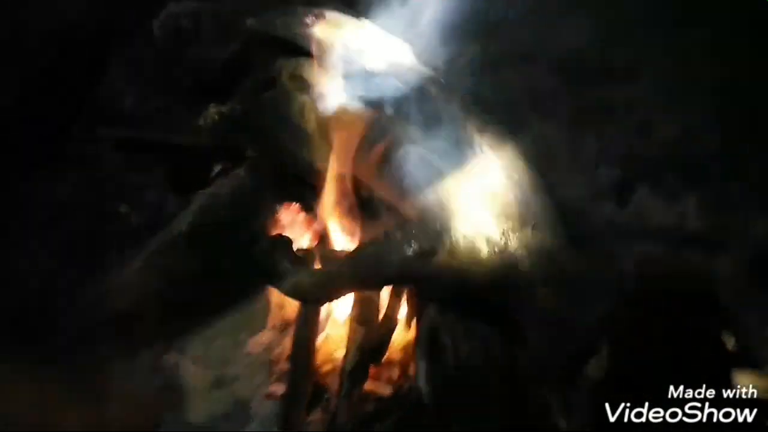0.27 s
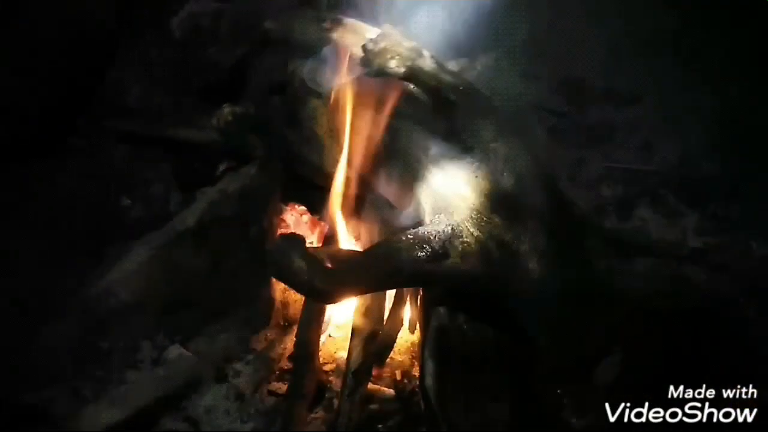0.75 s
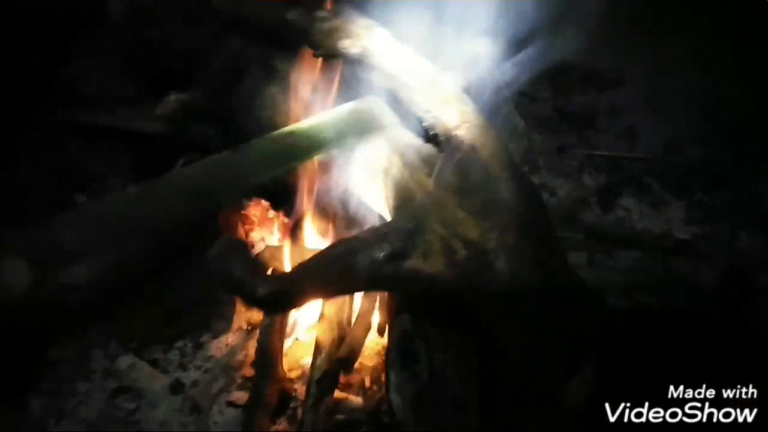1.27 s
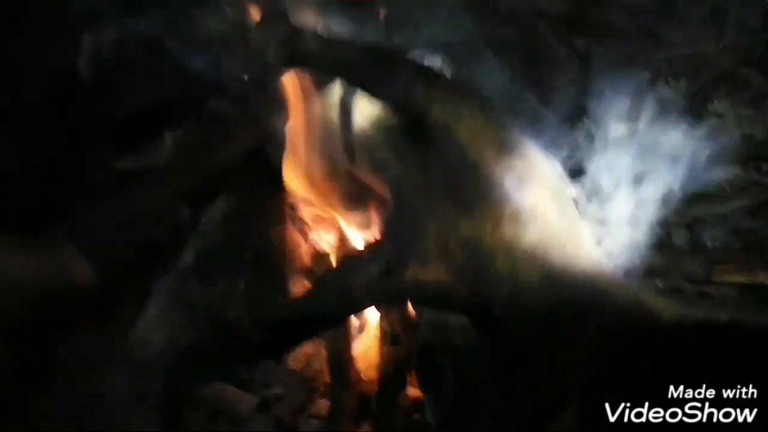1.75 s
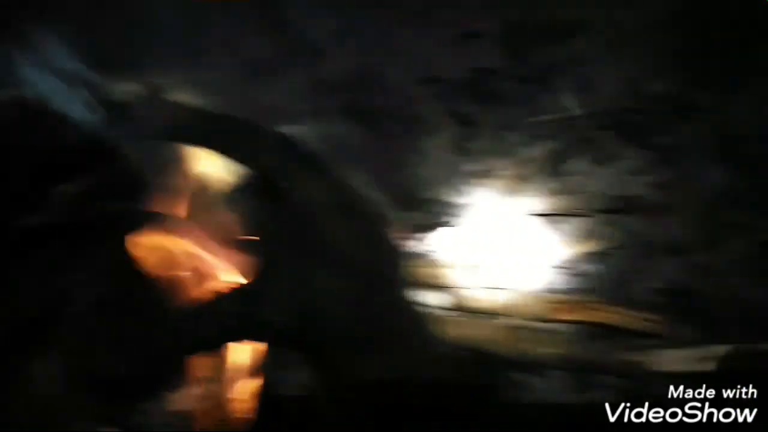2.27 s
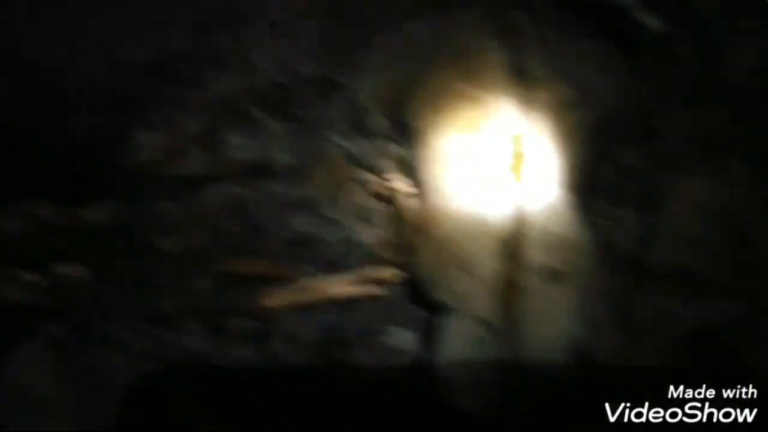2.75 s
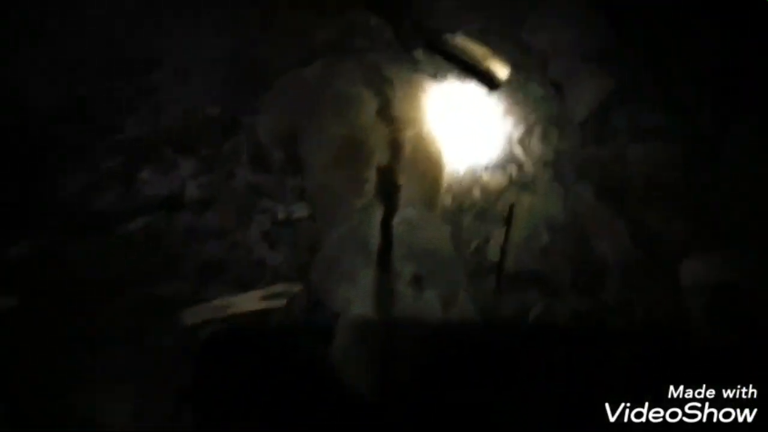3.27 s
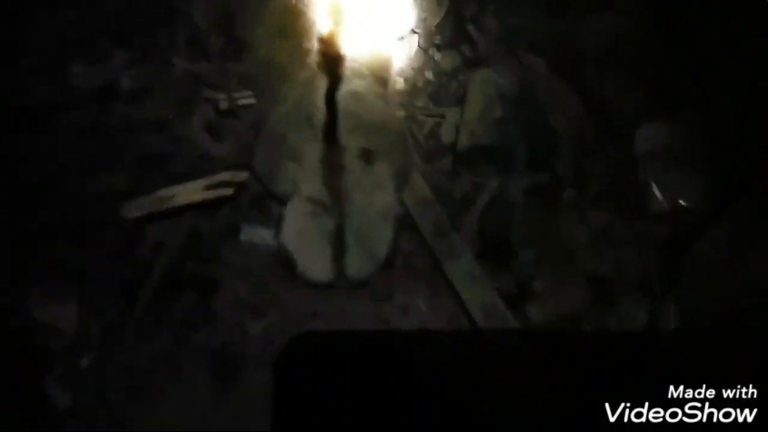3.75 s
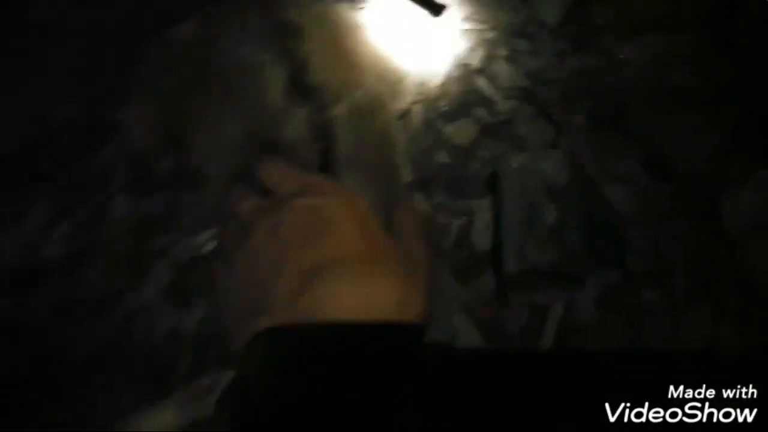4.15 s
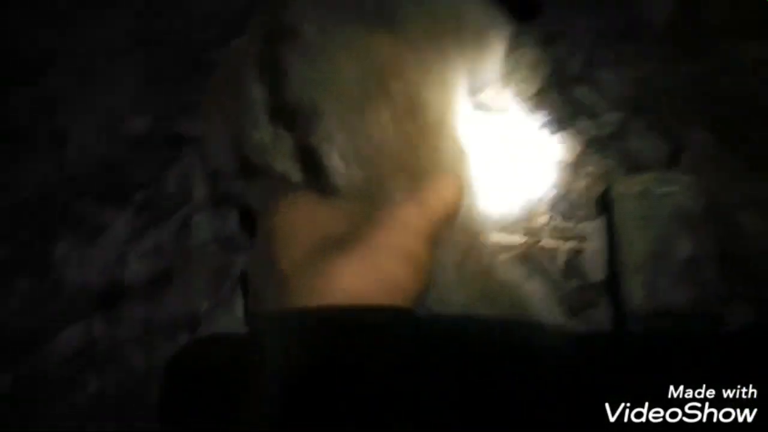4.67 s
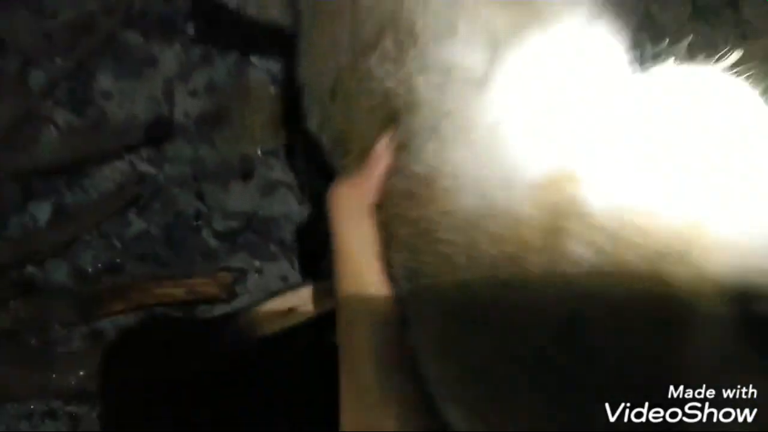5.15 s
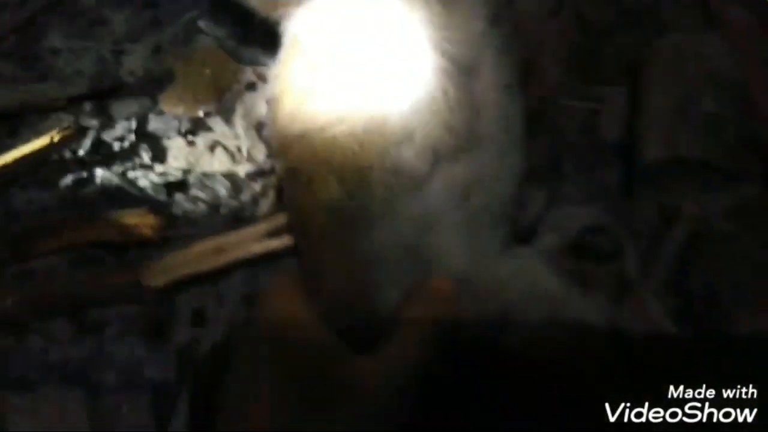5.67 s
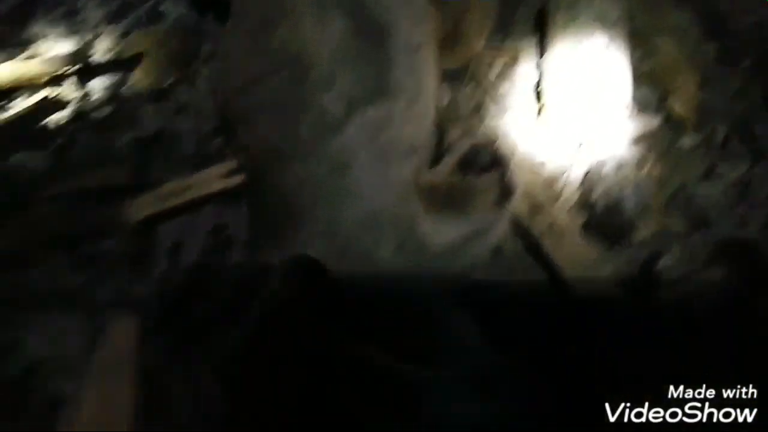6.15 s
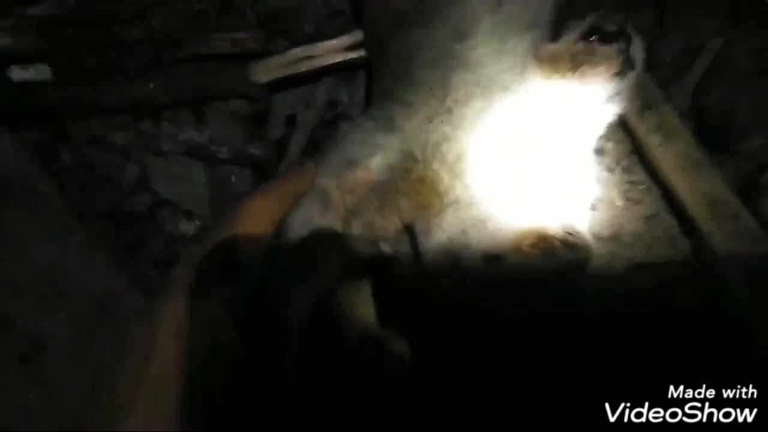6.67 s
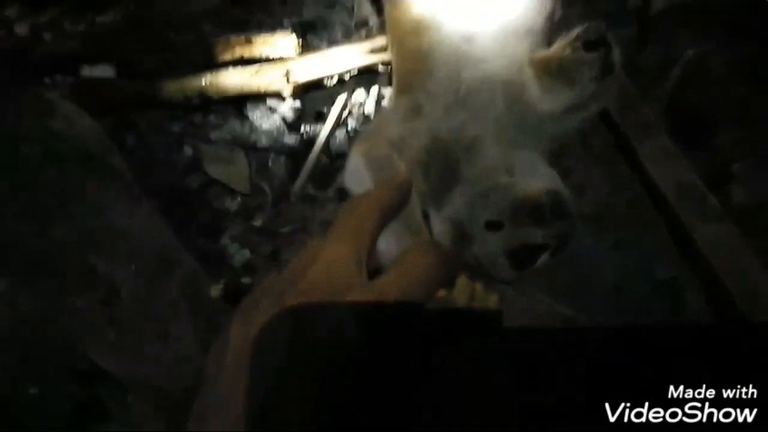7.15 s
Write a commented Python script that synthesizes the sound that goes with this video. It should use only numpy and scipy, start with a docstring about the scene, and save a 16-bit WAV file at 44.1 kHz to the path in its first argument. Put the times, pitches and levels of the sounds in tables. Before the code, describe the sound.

Shrill steady insect buzzing outdoors at night, with spurts of steam and snapping wood nearby, followed by soft dragging, bumps and a stick clatter.

```python
"""A cicada drones near 5 kHz on the left over far insects: fast clicks ring its abdomen, crickets rub pulses.
Close by, steam hisses in spurts from damp firewood (shaped noise), sap pops, wood snaps and flames rumble.
Near 2.7 s the steady hiss falls away, and then the rumble sinks slowly.
A hand drags a furry animal body over dry leaves and sticks: grainy noise scrapes, crinkles and swishes,
low tones bump, and a set of short-lived tones makes the sticks clack."""
import sys
import numpy as np
from scipy import signal
from scipy.fft import rfft, irfft, next_fast_len
from scipy.io import wavfile
from scipy.ndimage import uniform_filter1d, map_coordinates

SR = 44100
rng = np.random.default_rng(int(sys.argv[2]) if len(sys.argv) > 2 else 0)


def output_pcm(signal):
    """Save a mono or channel-first signal as 16-bit PCM at the path in sys.argv[1].

    Samples are clipped to [-1, 1] before scaling.
    """
    pcm = np.clip(np.atleast_2d(signal).T, -1, 1) * 32767
    wavfile.write(sys.argv[1], SR, np.round(pcm).astype(np.int16))


N = 326340


def amp(db):
    """Decibels to gain."""
    return 10 ** (np.asarray(db) / 20)


def unit(x):
    """Scale to rms 1 (rms is the average strength)."""
    return x / np.sqrt(np.mean(x ** 2) + 1e-20)


def clock(count=N):
    """Sample times in seconds."""
    return np.arange(count) / SR


def along(points, hz):
    """Read (Hz, value) points on a log frequency axis."""
    point_hz, values = np.transpose(points)
    return np.interp(np.log(hz + 1), np.log(point_hz + 1), values)


def curves(rows):
    """Join the rows into one value per sample, for each column after the time."""
    s, *columns = np.transpose(rows)
    return [np.interp(clock(), s, column) for column in columns]


def wobble(rate):
    """A smooth random curve with rate random points a second."""
    coarse = clock()[::32]
    knots = rng.standard_normal(int(N * rate / SR) + 4)
    return np.interp(clock(), coarse, map_coordinates(knots, [coarse * rate]))


def swell(start, length, db, attack, release):
    """Gain that rises over attack s to start, holds for length s and dies at release dB a second."""
    t = clock() - start
    rise = np.exp(-np.minimum((np.minimum(t, 0) / attack) ** 2, 20))
    fall_db = np.minimum(abs(release) * np.maximum(t - length, 0), 100)
    return rise * amp(db - fall_db)


def filtered(x, response):
    """Multiply the spectrum of x by a response that depends on frequency."""
    m = next_fast_len(N + 8192)
    return irfft(rfft(x, m) * response(np.fft.rfftfreq(m, 1 / SR)), m)[..., :N]


def pan(db):
    """Left and right gains for a level difference; positive leans left."""
    return amp([[db / 2], [-db / 2]])


def add(track, s, sound):
    """Mix a sound into a track at time s."""
    part = track[..., round(s * SR):][..., :sound.shape[-1]]
    part += sound[..., :part.shape[-1]]


def noise(spectrum, alike=0):
    """Coloured stereo noise of rms 1; alike is the share common to both sides."""
    white, alike = rng.standard_normal((3, N)), np.clip(alike, 0, 1)
    pair = np.sqrt(1 - alike) * white[:2] + np.sqrt(alike) * white[2]
    return unit(filtered(pair, lambda hz: amp(along(spectrum, hz))))


def whine(centre_hz, width_hz):
    """Stereo noise of rms 1 in one narrow resonance."""
    def resonance(hz):
        return 1 / (1 + ((hz - centre_hz) / (width_hz / 2)) ** 4) ** .5
    return unit(filtered(rng.standard_normal((2, N)), resonance))


def grains(rate):
    """Sparse stereo impulses of uneven size, rms 1; rate is their average number a second."""
    size = rng.standard_normal((2, N)) * amp(0.85 * rng.standard_normal(N))
    return unit(size * (rng.random(N) < rate / SR))


def patchy(x):
    """Vary the colour of a sound at random in small patches of time and pitch."""
    z = signal.stft(x, nperseg=512)[2]
    field = uniform_filter1d(rng.standard_normal(z.shape[1:]), 3, 0)
    field = uniform_filter1d(field, 7, 1)
    depth_db = 3.5
    return signal.istft(z * unit(amp(depth_db * unit(field))), nperseg=512)[1][:, :N]


def crackling(spectrum, rate, share):
    """Coloured, patchy noise, a share of it in tiny clicks."""
    share = np.clip(share, 0, 1)
    clicks = unit(filtered(grains(rate), lambda hz: amp(along(spectrum, hz))))
    return patchy(np.sqrt(share) * clicks + np.sqrt(1 - share) * noise(spectrum, alike=0.33))


def echoes(x):
    """The trees scatter a sound into a fading tail; the highest treble dies first."""
    # how long the forest rings: [pitch_hz, t60_s (time to fall 60 dB)]
    forest = [(150, 0.74), (1000, 0.41), (4000, 0.58), (12000, 0.22)]
    hz, t, z = signal.stft(rng.standard_normal((2, SR // 2)), SR, nperseg=256)
    decay = amp(-60 * t / along(forest, hz)[:, None])
    tail = signal.istft(z * decay, SR, nperseg=256)[1]
    return signal.fftconvolve(x[None], tail / np.linalg.norm(tail[0]), axes=1)[:, :N]


def night():
    """Still air is soft noise; far away a faint, wavering tone of narrow noise comes and goes."""
    # colour of the air: [pitch_hz, relative level_db]
    air = [(400, -4), (600, 12), (770, -0.5), (1100, 0), (1500, -2), (2500, 3.5), (4000, -31), (7300, 11.5),
           (9500, -22), (14000, -23)]
    # the far tone: [start_s, hold_s, level_db, pitch_hz]
    hums = [(3.344, 0.25, -73, 773), (6.87, 0.43, -64.5, 760)]
    hum = sum(swell(s, hold, db, attack=0.15, release=92) * whine(hz, 62) for s, hold, db, hz in hums)
    still_air = amp(-74.0 + 1.5 * wobble(2.7)) * noise(air, alike=0.045)
    return still_air + amp(3 * wobble(11)) * hum


def calls():
    """Soft hoarse calls from the trees: a breathy whistle of narrow noise."""
    # [start_s, hold_s, level_db]
    far_calls = [(2.484, 0.11, -54.5), (3.23, 0.088, -63.5), (5.737, 0.12, -58.5), (6.446, 0.1, -61)]
    level = sum(swell(s, hold, db, attack=0.013, release=192) for s, hold, db in far_calls)
    return level * whine(2936, 185) * pan(2.6)


def chirps(pace, beat_s, hz, sweep_hz, width_hz, depth_db):
    """Rising chirps of rms 1, pace a second and uneven in strength; the beat is set to peak at beat_s."""
    turns = np.cumsum(pace * np.ones(N)) / SR
    stroke = 2 * np.pi * (turns - np.interp(beat_s, clock(), turns))
    phase = 2 * np.pi * np.cumsum(hz + sweep_hz * np.sin(stroke)) / SR
    # slow noise on both parts of the tone makes it hoarse
    ring = (1 + whine(0, width_hz)) * np.cos(phase) + whine(0, width_hz) * np.sin(phase)
    return unit(amp(depth_db * np.cos(stroke) + wobble(9.3)) * ring)


def chirpers():
    """Three insects beat out chirps whose pitch glides up, each at its own pace."""
    # a quick, even chirper on the left: [time_s, level_db, pitch_hz, chirps_per_s]
    quick_rows = [(.3, -57, 4460, 8.87), (1.6, -50, 4540, 8.87), (2.24, -52, 4540, 8.87),
                  (3.3, -59, 4560, 8.5), (4.43, -54, 4600, 8.8), (5.1, -48.5, 4620, 8.8),
                  (6.6, -58, 4560, 8.8)]
    # a slower, hoarser one answers in bouts: [time_s, level_db]
    answer_rows = [(1.5, -64), (2.55, -49.5), (3.3, -74), (3.95, -48), (4.7, -72), (5.6, -53), (6.2, -66)]
    # a katydid lisps high above them: [time_s, chirps_per_s]
    katydid_rows = [(3.6, 5.13), (4.0, 4.68), (5.3, 4.68), (5.7, 4.89)]
    level_db, hz, pace = curves(quick_rows)
    quick = chirps(pace, beat_s=1.56, hz=hz, sweep_hz=110, width_hz=120, depth_db=14)
    slow = chirps(7, beat_s=2.53, hz=4400, sweep_hz=70, width_hz=260, depth_db=12)
    high = chirps(*curves(katydid_rows), beat_s=2.64, hz=8624, sweep_hz=55, width_hz=210, depth_db=8)
    left_pair = amp(level_db) * quick + amp(curves(answer_rows)) * slow
    return left_pair * pan(12.5) + amp(-60) * high * pan(-1)


def crickets():
    """Each species rubs quick pulses, grouped in chirps, into its own narrow resonance."""
    # a thin, steady high tone near 6.3 kHz, heard until about 3.6 s: [start_s, hold_s, level_db]
    high_tone = (0, 3.55, -53.5)
    # [pitch_hz, width_hz, level_db, left_minus_right_db, chirps_per_s, chirp_depth_db, pulses_per_s]
    insects = [(3078, 66, -66, 11.5, 4.4, 1.5, 92), (10690, 117, -61, -8.5, 4.2, 2.5, 260),
               (10270, 200, -67.5, -15, 1.01, -6.5, 70)]
    out = swell(*high_tone, attack=.05, release=43) * whine(6285, 54) * pan(3.9)
    for hz, width_hz, db, side_db, chirp_rate, depth_db, pulse_rate in insects:
        chirp_phase = 2 * np.pi * chirp_rate * clock() + 1.11 * wobble(1.733)
        chirp_gain = amp(depth_db * np.sin(chirp_phase) + 2.9 * wobble(3.3))
        pulses = 1 + 0.15 * np.sin(2 * np.pi * pulse_rate * clock() + wobble(17))
        out += amp(db) * unit(chirp_gain * pulses * whine(hz, width_hz)) * pan(side_db)
    return out


def tymbal(click_hz, body, scatter, fade_rate, swells=()):
    """Rapid clicks ring the abdomen; shifting paths through the trees make each harmonic fade on its own."""
    coarse = clock()[::32]
    orders = np.arange(55, 81)[:, None]  # the harmonics of the click rate that sound
    middle = orders.mean()
    knots = rng.standard_normal((len(orders), 2, 128))
    drift = np.array([[map_coordinates(k, [coarse * fade_rate], mode="mirror") for k in pair]
                      for pair in knots])
    # the ribs buckle one after another, which draws each click out into a short falling sweep
    sweep = .36 * (orders - middle) ** 2
    fade = np.array([wobble(5)[::32] for order in orders])
    lag = np.array([wobble(1.2)[::32] for order in orders])
    direct = amp(3.3 * fade) * np.exp(1j * (sweep + lag))
    for s, hold, hz, lift_db in swells:
        shape = swell(s, hold, 0, attack=0.04, release=65)[::32]
        direct[np.argmin(abs(orders * click_hz - hz))] *= amp(lift_db * shape)
    scattered = scatter * (drift[:, 0] + 1j * drift[:, 1])
    # sum the harmonics as a slow envelope around the middle one, at 1/16 of the sample rate
    paths = signal.resample_poly(direct + scattered, 2, 1, axis=1)
    slow_t = np.arange(paths.shape[1]) * 16 / SR
    beats = np.exp(2j * np.pi * (orders - middle) * click_hz * slow_t)
    envelope = (amp(along(body, orders * click_hz)) * paths * beats).sum(0)
    envelope = signal.resample_poly(envelope, 16, 1)[:N]
    return unit(np.real(envelope * np.exp(2j * np.pi * middle * click_hz * clock())))


def cicadas():
    """Two cicadas click over a blurred chorus of noise; the right side gets more scattered sound."""
    # clicks a second: [near_hz, farther_hz]
    click_rates = [77.02, 72.9]
    # the near one's resonant abdomen, then the farther one's: [pitch_hz, harmonic level_db]
    abdomen = [(4240, -34), (4540, -17), (4775, -12), (4850, -5.5), (5006, -1.5), (5083, -3), (5160, -.5),
               (5314, 2.5), (5468, -2.5), (5545, -7.5), (5622, -13), (5700, -21), (5860, -20), (6160, -36)]
    neighbour = [(4450, -24), (4800, -8), (4960, 0), (5035, 0), (5110, -2), (5200, -4), (5330, -3),
                 (5420, -12), (5700, -34)]
    # colour of many more cicadas far off: [pitch_hz, relative level_db]
    chorus = [(2500, -77), (3500, -61.5), (4000, -11.5), (4400, -10.5), (4800, -2.5), (5050, 6), (5300, 9),
              (5480, 4), (5650, -10.5), (6100, -15.5), (6700, -64)]
    # one partial of the drone swells and stands out: [start_s, hold_s, pitch_hz, lift_db]
    partial_swells = [(.1, 1.55, 5006, 4), (.45, .8, 5237, 9), (.7, .55, 5314, 5), (1.6, .1, 5237, 9),
                      (1.68, .1, 5314, 4), (1.8, .5, 5160, 5), (3.3, .65, 5314, 5), (3.3, .2, 5391, 7),
                      (4.55, .3, 5160, 9), (5.12, .55, 5314, 8), (6.05, .35, 5314, 10)]
    # level of the song on the left, where the near one's effort is heard: [time_s, level_db]
    left_rows = [(0.3, -28.5), (0.5, -23.5), (1.45, -25), (1.68, -23), (1.98, -26.5), (2.9, -27.5),
                 (3.4, -24.5), (3.65, -29), (3.87, -26), (3.97, -31), (4.1, -25.5), (4.5, -27.5),
                 (4.65, -24.5), (5.65, -23), (5.82, -26), (6.75, -26), (7.0, -29.5), (7.15, -26.5)]
    # level of the song on the quieter right: [time_s, level_db]
    right_rows = [(0, -36), (2.15, -38.5), (2.45, -35), (4.9, -36.5), (5.3, -38), (7.4, -38)]
    near_hz, far_hz = click_rates
    left = tymbal(near_hz, abdomen, scatter=.4, fade_rate=6, swells=partial_swells)
    right = tymbal(near_hz, abdomen, scatter=.9, fade_rate=4)
    second = np.array([tymbal(far_hz, neighbour, scatter=1.5, fade_rate=7) for side in range(2)])
    song = np.array([left, right]) + amp(-12) * second + amp(-6.3) * noise(chorus)
    # even out the loudness before the level curves shape it
    song /= np.sqrt(np.abs(uniform_filter1d(song ** 2, size=SR // 3)) + 1e-9)
    waver_db = .7 * wobble(8)
    return song * amp(np.array(curves(left_rows) + curves(right_rows)) + waver_db)


def fire():
    """Flames rumble; steam escapes from damp wood as a fine hiss with broader, crackling spurts."""
    # colours of the fine hiss, the broad rush and the flames: [pitch_hz, relative level_db]
    hiss_colour = [(5000, -47), (7000, -10.5), (9000, -2), (10800, 3.5), (12500, 3), (14400, -1)]
    spurt_colour = [(300, -30), (480, -42), (700, -11), (1100, -12), (1500, 3), (2200, 7), (4000, 7.5),
                    (6500, 8), (9000, 4), (14400, -1)]
    rumble_colour = [(25, -29), (72, 3), (134, 3), (231, -3.5), (302, -15), (399, -22.5), (450, -46),
                     (990, -120)]
    # spurts of steam: [time_s, rush level_db, relative hiss level_db, width_s]
    steam_spurts = [(0.011, -38.5, -31.5, 0.017), (0.086, -40, -36, 0.026), (0.173, -38.5, -31, 0.027),
                    (0.394, -44, -38, 0.018), (.42, -42.5, -35.5, 0.043), (0.638, -41, -37, 0.016),
                    (0.68, -38.5, -34, 0.035), (0.862, -45, -40.5, 0.023), (1.176, -48.5, -39.5, 0.042),
                    (1.329, -71.5, -29.5, 0.019), (1.431, -43.5, -39, 0.0094), (1.567, -47, -34.5, 0.027),
                    (1.68, -49.5, -37, 0.021), (1.789, -43.5, -38, 0.03), (2.011, -44.5, -43.5, 0.033),
                    (2.315, -49, -41.5, 0.024), (2.444, -53, -47, 0.02)]
    # the steady hiss and the murmur fall away: [from_s, to_s]
    drop_times = [2.54, 2.86]
    # the flames flare up: [start_s, hold_s]
    flare = (1.05, 0.3)
    dropped = np.interp(clock(), drop_times, [0, 1])
    steam_db, drop_db = -54, 33
    rush, fine = np.zeros(N), amp(steam_db - drop_db * dropped)
    for s, rush_db, hiss_db, width in steam_spurts:
        u = (clock()[:3 * SR] - s) / width
        jet = np.where(u < 0, np.exp(-u ** 2 / 2), 1 / (1 + (u / 2.01) ** 2) ** 2)  # opens fast, trails off
        add(rush, 0, amp(rush_db) * jet)
        add(fine, 0, amp(hiss_db - 10.5) * jet)
    hiss = fine * crackling(hiss_colour, rate=600, share=.5) * pan(-18.1)
    grit = amp(2.1 * wobble(130)) * crackling(spurt_colour, rate=500, share=.5)
    spurts = rush * grit * pan(-5.0)
    # a faint wavering murmur of the flames
    murmur = amp(-78.5 + 3.2 * wobble(1.07)) * (whine(603, 72) + whine(1326, 106))
    flame_db = -61.5 - 1.7 * np.maximum(clock() - drop_times[1], 0)  # sinks 1.7 dB a second
    flare_db = 3 * swell(*flare, 0, attack=0.061, release=60)
    rumble = amp(flame_db + flare_db + 3.2 * wobble(15.0)) * noise(rumble_colour, alike=0.72)
    return hiss + spurts + (1 - dropped) * murmur + rumble


def sputters():
    """A wet spurt starts as sap boils at the mouth of a crack in a few coarse, low grains."""
    # [time_s, level_db]
    sputter_rows = [(0.062, -51.5), (0.392, -52.5), (1.17, -56.5), (1.64, -62)]
    # colour: [pitch_hz, relative level_db]
    sputter_colour = [(300, -36), (450, -24), (650, 1.5), (1000, 6), (1400, 5), (2500, -24)]
    level = sum(swell(s, 0.0049, db, attack=0.012, release=159) for s, db in sputter_rows)
    return level * crackling(sputter_colour, rate=200, share=0.26) * pan(-1.5)


def pops():
    """A bursting pocket of sap is one short push that rings its log; ground and logs return it later."""
    # pops and cracks of wood: [time_s, relative level_db, pitch_hz]
    pop_rows = [(0.632, -41, 1920), (2.03, -35.5, 1090), (2.075, -36, 630), (2.354, -42, 740),
                (2.559, -31.5, 1080), (2.768, -25, 1150), (2.861, -31, 1160), (3.31, -30.5, 1250),
                (3.339, -39.5, 426), (4.464, -43.5, 1040), (6.785, -44.5, 1100)]
    out, t = np.zeros((2, N)), clock(count=SR // 16)
    for s, db, hz in pop_rows:
        u = np.pi * hz * (t - .002)
        push = (1 - 1.62 * u ** 2) * np.exp(-u ** 2)
        modes = np.sin(2 * np.pi * 0.64 * hz * t) + np.sin(2 * np.pi * 1.7 * hz * t)
        ring = amp(-26.0 - 60 * t / 0.038) * modes
        paths = 0.024 * rng.standard_normal((2, len(t))) * amp(-60 * t / 0.19)
        paths[:, 0] = 1  # the direct sound
        add(out, s - .002, amp(db) * signal.fftconvolve(paths, (push + ring)[None], axes=1))
    return patchy(out * pan(15.1) + amp(-8.5) * echoes(out.mean(0)))


def snaps():
    """Fibres part with a tiny bright tick of noise, each in its own band."""
    # [time_s, relative level_db, brightest_hz]
    snap_rows = [(1.151, -29, 9600), (1.4243, -22.5, 11800), (1.67, -32, 10000), (4.3925, -38, 10000),
                 (4.467, -34, 9600), (4.992, -41, 8150), (5.348, -36.5, 8400)]
    out, t = np.zeros(N), clock(count=SR // 16)
    for s, db, bright_hz in snap_rows:
        band = amp(-25 * np.log2((np.fft.rfftfreq(len(t), 1 / SR) + 1) / bright_hz) ** 2)
        tick = unit(irfft(rfft(rng.standard_normal(len(t))) * band, len(t)))
        add(out, s, amp(db - 13 - 60 * t / 0.082) * tick)
    return out * pan(-22.5)


def sizzle():
    """Fine grains at the very top of the treble swell and ebb in a thin sizzle."""
    # [start_s, hold_s, level_db]
    sizzle_rows = [(2.848, 0.25, -60), (3.326, 0.06, -53), (6.697, 0.068, -56.5), (7.254, 0.2, -56)]
    # colour: [pitch_hz, relative level_db]
    sizzle_colour = [(9000, -49), (11000, 4), (12200, 2), (14300, -3.5)]
    level = sum(swell(s, hold, db, attack=0.071, release=72) for s, hold, db in sizzle_rows)
    return level * crackling(sizzle_colour, rate=900, share=0.3) * pan(-7)


def knocks():
    """Soft bumps are a few low cycles; sticks clatter briefly, brighter for a harder contact."""
    # dull bumps of wood and ground: [time_s, relative level_db, pitch_hz, t60_s]
    bumps = [(1.669, -31.5, 208, 0.024), (1.804, -37, 189, 0.043), (2.028, -37, 207, 0.044),
             (2.164, -42, 283, 0.042), (3.777, -29, 127, 0.088), (4.343, -19.5, 248, 0.016),
             (5.813, -37.5, 760, 0.024), (6.715, -40, 500, 0.024)]
    # sticks knock together: [time_s, relative level_db, brightest_hz, hollow low ring level_db]
    clacks = [(5.044, -31.5, 1520, -38), (5.068, -20, 2860, -58), (5.123, -37.5, 1800, -52),
              (5.151, -33.5, 930, -41.5), (5.295, -44.5, 1370, -49), (6.713, -42, 2600, -52)]
    # the tones a stick rings with: [pitch_hz, relative level_db, t60_s]
    stick = [(925, 1, 0.064), (1217, -1.5, 0.12), (1530, 3.5, 0.091), (1810, 0.5, 0.11), (2353, -2, 0.079),
             (3090, -7, 0.044), (3650, 0.5, 0.08), (4260, 8.5, 0.032)]
    hollow_hz, hollow_t60_s = 455, 0.067  # the low ring of the thickest stick
    out, t = np.zeros(N), clock(count=SR // 3)
    for s, db, hz, t60 in bumps:
        body = np.sin(2 * np.pi * hz * t)
        body += .5 * np.sin(2 * np.pi * 0.75 * hz * t)
        body += 0.45 * np.sin(2 * np.pi * 1.46 * hz * t)
        add(out, s, amp(db + 5.5 - 60 * t / t60) * body * (1 - np.exp(-t / 0.007)))
    for s, db, bright_hz, hollow_db in clacks:
        hollow = np.sin(2 * np.pi * hollow_hz * t) * (1 - np.exp(-t / 0.0059))
        add(out, s, amp(hollow_db - 60 * t / hollow_t60_s) * hollow)
        for hz, level, t60 in stick:
            chatter = np.cumsum(.075 * rng.standard_normal(len(t)))  # loose contact blurs each tone
            ring = np.sin(2 * np.pi * hz * t + chatter) * (1 - np.exp(-t / 0.0021))
            dulling_db = 15.6 * np.log2(hz / bright_hz) ** 2
            add(out, s, amp(db - 9 + level - dulling_db - 60 * t / t60) * ring)
    return out * pan(1.7) + amp(-7.5) * echoes(out)


def gliding(start, length, from_hz, to_hz, width_hz):
    """Half a second of stereo band noise of rms 1 whose centre slides; it begins .1 s before start."""
    t = clock(count=SR // 2) - .1
    low = signal.butter(3, min(abs(width_hz) / 2, SR / 4), fs=SR, output="sos")
    a, b = signal.sosfilt(low, rng.standard_normal((2, 2, len(t))))
    phase = 2 * np.pi * np.cumsum(np.interp(t, [0, length], [from_hz, to_hz])) / SR
    out = np.zeros((2, N))
    add(out, start + t[0], unit(a * np.cos(phase) + b * np.sin(phase)))
    return out


def swishes():
    """Fur and cloth slide past lightly: a band of noise moves with their speed and catches unevenly."""
    # [start_s, hold_s, level_db, from_hz, to_hz, width_hz]
    swish_rows = [(4.993, 0.14, -50.5, 2296, 2655, 1250), (6.665, 0.093, -53.5, 1730, 1950, 810),
                  (6.791, 0.18, -68, 2300, 2020, 1200)]
    out = np.zeros((2, N))
    for s, hold, db, from_hz, to_hz, width_hz in swish_rows:
        level = swell(s, hold, db, attack=0.0081, release=292)
        out += level * gliding(s, hold, from_hz, to_hz, width_hz)
    return out * amp(2.3 * wobble(90)) * pan(0.88)


def rustle():
    """Each stroke makes a grainy scrape, duller under weight, and dry leaves crinkle above it."""
    # strokes over wood, leaves and fur: [start_s, hold_s, dull scrape level_db, crisp crinkle level_db]
    strokes = [(1.604, 0.049, -44.5, -53), (2.754, 0.022, -55.5, -50), (3.283, 0.13, -59.5, -74),
               (3.596, 0.5, -75, -75), (4.066, 0.3, -51, -63), (4.461, 0.016, -59.5, -47),
               (4.982, 0.11, -60.5, -50.5), (5.304, 0.063, -57.5, -83), (5.35, 0.03, -71, -55),
               (6.175, 0.015, -73, -53), (6.713, 0.042, -49.5, -67), (6.83, 0.37, -70, -70.5)]
    # the body's weight slides on the ground: [start_s, hold_s, level_db]
    weight_slide = (4.25, 0.094, -50)
    # colours of the scrape and of the dry leaves: [pitch_hz, relative level_db]
    scrape_colour = [(100, -37), (250, 2), (330, -10.5), (500, -6.5), (1000, -6.5), (1700, -8), (2500, -8),
                     (4000, -4), (7000, -15.5), (14000, -25)]
    crisp_colour = [(3000, -20), (6500, 0), (9000, -1), (11800, 0), (14400, -4)]
    slide_colour = [(200, -28), (480, 5.5), (1300, -5.0), (2500, -47), (5000, -51)]
    attack_s, release_db_per_s = 0.019, 189
    rub, stir = np.zeros(N), np.zeros(N)
    for s, hold, scrape_db, crinkle_db in strokes:
        # a long stroke starts more gently
        stroke = swell(s, hold, 0, attack_s + 0.028 * hold, release_db_per_s)
        rub += amp(scrape_db) * stroke
        stir += amp(crinkle_db) * stroke
    weight = swell(*weight_slide, attack_s, release_db_per_s)
    scrape = rub * crackling(scrape_colour, rate=410, share=0.19) * pan(4.0)
    slide = weight * crackling(slide_colour, rate=230, share=0.28) * pan(3.2)
    leaves = stir * crackling(crisp_colour, rate=310, share=0.42) * pan(-7.0)
    catch_and_slip = amp(2 * wobble(45))
    return catch_and_slip * (scrape + slide + leaves)


def scene():
    """Insects all round, the fire and the handling close by."""
    insects = chirpers() + crickets() + cicadas()
    burning = fire() + sputters() + pops() + snaps()
    handling = knocks() + swishes() + rustle()
    return night() + calls() + insects + burning + sizzle() + handling


def record(dry):
    """Keep nothing at or above the band limit of 14300 Hz."""
    return filtered(dry, lambda hz: hz < 14300)


dry = scene()
out = record(dry)
output_pcm(out)
```